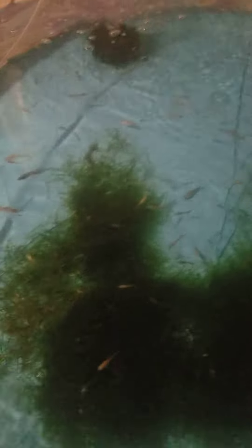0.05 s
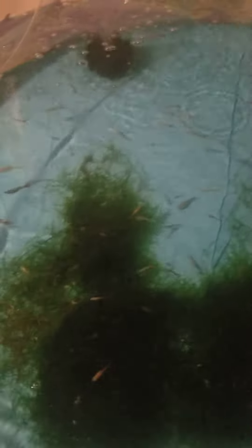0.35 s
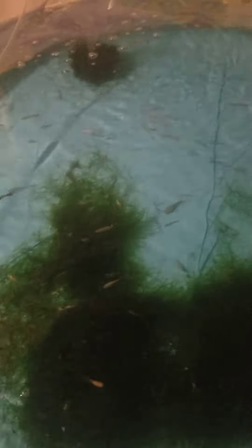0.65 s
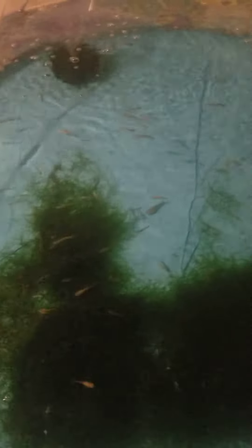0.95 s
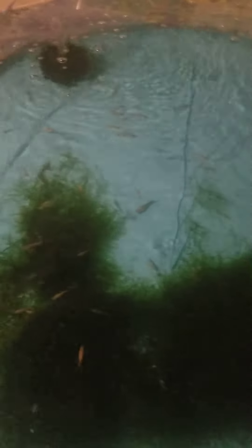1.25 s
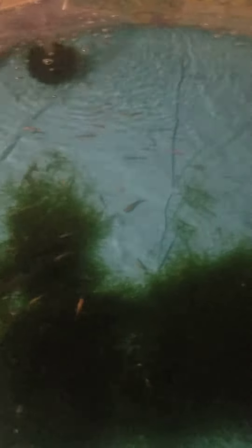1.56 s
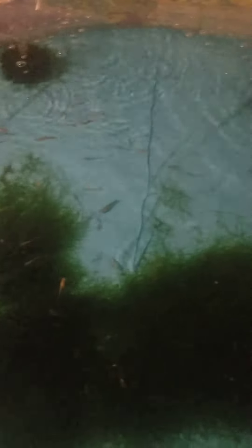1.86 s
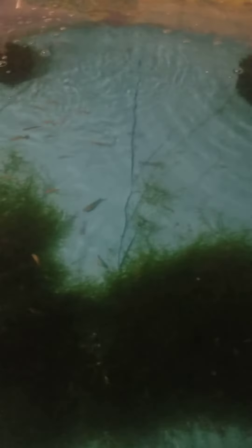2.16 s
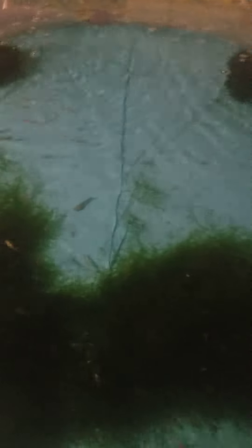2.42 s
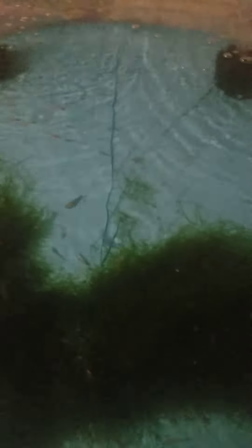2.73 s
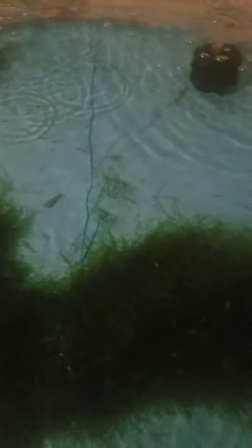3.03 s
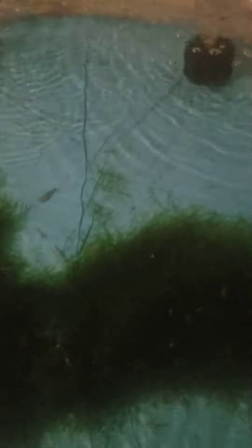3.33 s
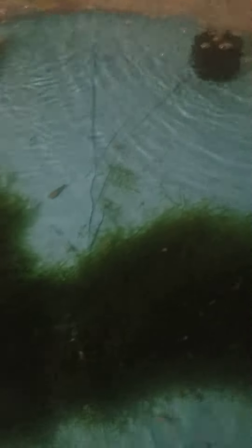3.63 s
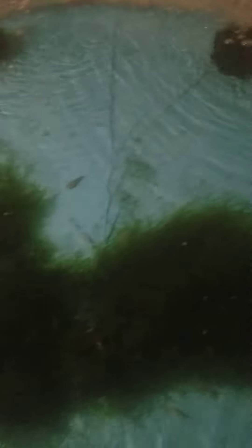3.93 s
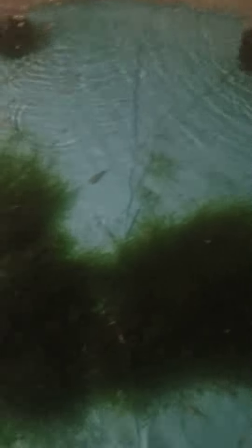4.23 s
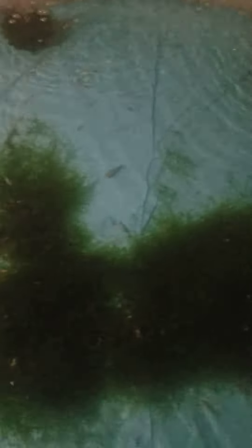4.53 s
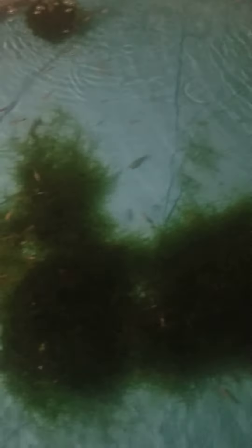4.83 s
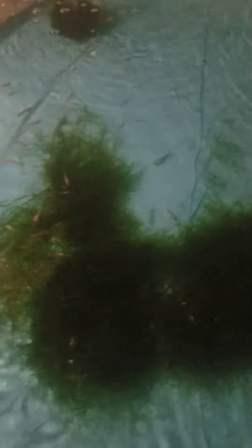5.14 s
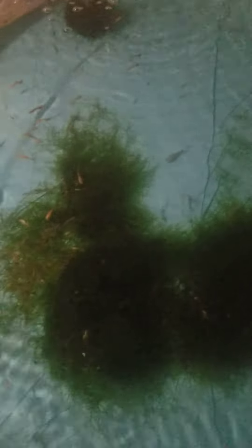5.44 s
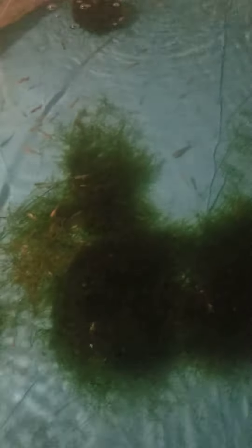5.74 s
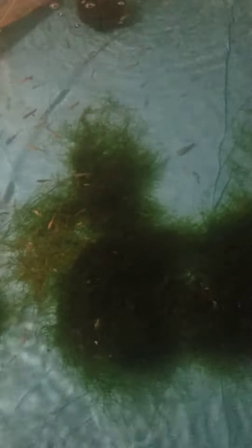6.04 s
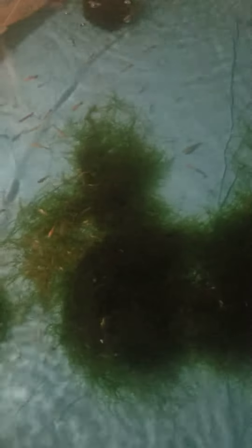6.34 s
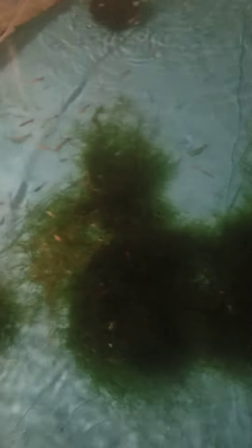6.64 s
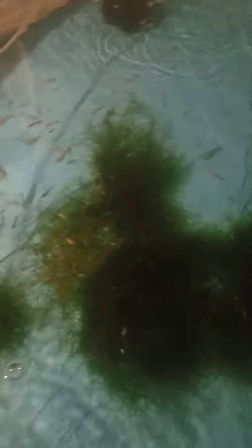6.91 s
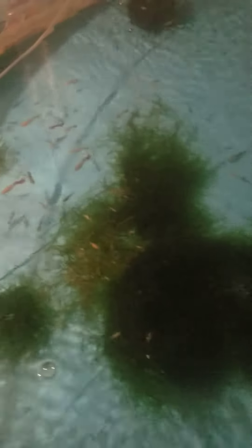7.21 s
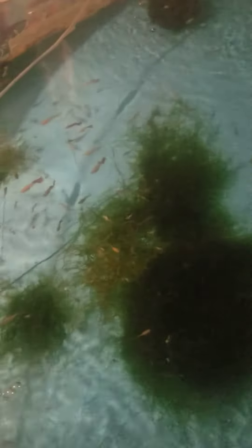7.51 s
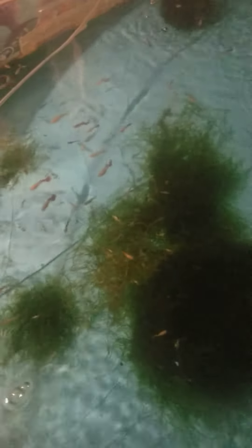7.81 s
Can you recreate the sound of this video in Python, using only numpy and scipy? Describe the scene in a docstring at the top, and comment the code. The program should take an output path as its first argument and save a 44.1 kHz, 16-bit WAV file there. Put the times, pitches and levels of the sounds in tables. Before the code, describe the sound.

Close above a fish tub indoors, an air pump keeps up a constant low hum while fine bubbles burst in a continuous high hiss. A soft rumble of churned water lies beneath, and four quiet bass thuds pass early on. As the hand-held microphone moves across the tub and back, the hiss gently changes colour and the hum turns slightly buzzier for a while.

```python
"""A bright, steady fizz, close above a fish tub indoors: tiny bubbles from an air stone snap and ping
at the surface. Beside the tub the air pump's diaphragm hums at twice the mains frequency, while the
rising plume burbles softly and four dull bumps sound low in the bass. A hand-held stereo microphone
drifts over the water, so the echoes of the tub slowly recolour the fizz."""
import sys
import numpy as np
from scipy import signal
from scipy.fft import rfft, irfft, next_fast_len
from scipy.io import wavfile
from scipy.ndimage import uniform_filter1d, map_coordinates

SR = 44100
rng = np.random.default_rng(int(sys.argv[2]) if len(sys.argv) > 2 else 0)


def store_pcm(level_fs):
    """Save levels as 16-bit WAV."""
    pcm = np.round(np.clip(level_fs, -1, 1) * 32767).astype(np.int16)
    wavfile.write(sys.argv[1], SR, np.atleast_2d(pcm).T)


N = 355887

# The fizz as the microphone nears and leaves the bubbles. Each row: time in seconds, level in dB.
FIZZ_LEVEL = [(0, -19), (3.2, -19.5), (3.9, -19), (4.7, -19), (5.3, -19), (6.3, -19.5), (8.07, -19.5)]


def fizz(t, swing):
    """Just below the microphone, films snap and the opened bubbles ping near 5 kHz."""
    spray = film_snaps()
    pings = bubbles(count=20000, pitch_hz=4907, spread=0.078, ring_cycles=7.9, scatter_db=4,
                    rise=0.0033, samples=400)
    pings = room(pings, t60_s=0.18, direct=0.097) * amp([[-12], [-7.5]])  # left, right
    cloud = tub(spray + pings, echo_gain=0.041, echo_from_hz=4500, longest_s=0.008, drift_s=0.00006)
    level_db, = curves(FIZZ_LEVEL, t)
    puffs_db = 0.15 * wobble(45, t)  # the air leaves the stone slightly unevenly
    lean_left_db = 0.3 - 0.2 * swing
    return amp(level_db + puffs_db + np.array([lean_left_db, -lean_left_db]) / 2) * cloud


# The colour of the bursting films at the left and at the right capsule.
# Each row: frequency in Hz, relative spectral level in dB.
SNAP_COLOUR_LEFT = [(500, -25), (1300, -30.5), (2150, -18.5), (2450, -14.5), (3100, -13), (4150, -8),
                    (4600, -2), (5500, -4.5), (6100, -13), (7100, -12), (7900, -23), (9200, -28),
                    (9900, -15), (11200, -19.5), (12200, -15.5), (13000, -17), (15000, -45)]
SNAP_COLOUR_RIGHT = [(500, -32.5), (1300, -31.5), (1550, -19.5), (2150, -20), (2450, -14), (3000, -14.5),
                     (3700, -5), (4700, 1), (5500, 0), (6100, -13), (7000, -17), (7900, -33.5),
                     (9200, -24.5), (9900, -16.5), (11200, -20), (12150, -13.5), (13000, -16.5),
                     (15000, -46)]


def film_snaps():
    """Thousands of bubble films snap every second and blend into a fine spray of sound."""
    def colour(hz):
        low_cut = hz / np.hypot(hz, 300)
        return amp([along(SNAP_COLOUR_LEFT, hz), along(SNAP_COLOUR_RIGHT, hz)]) * low_cut

    snaps = bubbles(count=50000, pitch_hz=6920, spread=0.7, ring_cycles=0.58, scatter_db=2,
                    rise=0, samples=32)
    band_hz, power = signal.welch(snaps, SR, nperseg=128, detrend=False)
    whitened = filtered(snaps, lambda hz: np.interp(hz, band_hz, power) ** -0.5)
    return unit(filtered(room(whitened, t60_s=0.15, direct=0.11), colour))


# The tub's narrow resonances and gaps, the same wherever the microphone is held.
# Each row: frequency in Hz, half width in Hz, lift in dB.
TUB_RESONANCES = [(3320, 50, 2), (3440, 60, -2.5), (3625, 40, 3), (3810, 35, 1.5), (3945, 35, 1.5),
                  (4060, 60, -2), (12200, 110, 2), (12850, 250, -2.5)]
# Standing waves over the water, each singing while a capsule passes through it; a negative lift is a
# node. Each row: middle in seconds, length in seconds, pitch in Hz, glide in Hz per second,
# half width in Hz, left lift in dB, right lift in dB.
TUB_STANDING_WAVES = [ (0.15, 0.73, 4640, 40, 80, -11, 9.5), (0.65, 1, 5250, -10, 115, 4, 2),
                      (0.964, 2.8, 4760, 30, 40, 2.5, 4.5), (1.1, 0.65, 5095, -70, 60, 5, 8),
                      (1.6, 0.95, 3680, 10, 40, 2.5, 7), (2.1, 0.68, 5700, 60, 50, 11, 2),
                      (2.35, 0.84, 5390, 60, 85, 8, 7), (2.9, 2.8, 3190, 54, 80, -5, 6.5),
                      (3.05, 0.55, 4400, -70, 90, -7, -11), (3.2, 1.1, 5170, 50, 65, 10, 1.5),
                      (3.25, 0.65, 5060, 40, 70, 0, 10), (3.5, 1.4, 3970, -130, 70, 0, 7.5),
                      (3.85, 2.4, 3450, -10, 70, 7, -1), (4.0, 1.7, 5850, -40, 70, 1.5, 9.5),
                      (4.15, 1, 4600, -60, 50, 6, -6), (4.7, 1.3, 5120, 70, 65, 4.5, 1),
                      (5.0, 2.8, 4780, 0, 45, 1.5, 5.5), (5.633, 1.8, 5296, 35, 72, 2.5, 12),
                      (6.1, 1.4, 4320, -20, 110, 3, 6.5), (6.9, 0.49, 5330, 70, 205, 5, 4.5),
                      (7.7, 1.5, 3300, -20, 50, 2.5, 10.5), (7.35, 2.7, 4770, 70, 40, 0, 6.5),
                      (7.482, 0.91, 4980, 40, 150, 4, 9), ]


def tub(sound, echo_gain, echo_from_hz, longest_s, drift_s, echoes=8, fade_s=0.11):
    """The tub colours the fizz with resonances, passing standing waves and drifting wall echoes."""
    hz, t, spectrum = signal.stft(sound, SR, nperseg=2048)
    hz = hz[:, None]

    def peak(centre_hz, width_hz):
        return 1 / (1 + ((hz - centre_hz) / width_hz) ** 2)

    def wall_echo():
        delay_s = longest_s * rng.uniform(0.25, 1) + drift_s * wobble(0.577, t)
        return np.exp(-2j * np.pi * hz * delay_s)

    lift_db = sum(db * peak(centre_hz, width_hz) for centre_hz, width_hz, db in TUB_RESONANCES)
    for middle_s, length_s, pitch_hz, glide, width_hz, *capsule_db in TUB_STANDING_WAVES:
        inside = 1 / (1 + np.exp((np.abs(t - middle_s) - length_s / 2) / fade_s))
        wave = inside * peak(pitch_hz + glide * (t - middle_s), width_hz)
        lift_db = lift_db + np.multiply.outer(capsule_db, wave)
    reflected = echo_gain * hz / np.hypot(hz, echo_from_hz)  # small walls reflect short waves best
    walls = np.array([1 + reflected * sum(wall_echo() for _ in range(echoes)) for capsule in sound])
    _, coloured = signal.istft(spectrum * amp(lift_db) * walls, SR, nperseg=2048)
    return unit(coloured[:, :N])


# The pump, heard from over the water. Each row: time in seconds, gain in dB for all its harmonics.
HUM_GAIN = [(0.0, -26.5), (2.0, -27), (5.42, -26.5), (8.07, -26.5)]
# The harmonics of the diaphragm's stroke. Each row: multiple of the hum's pitch, relative level in dB,
# extra gain in dB with the microphone swung fully right.
STROKE_HARMONICS = [(1, 4, 0), (2, -24, -1.5), (3, -25.5, -1.5), (4, -34, 1), (5, -26, -2), (6, -34, 9),
                    (7, -30.5, 0.5), (9, -32, 5.5), (11, -49, 12)]


def pump(t, swing, pitch_hz=120.02):
    """Beside the tub, the diaphragm hums almost purely; its weak overtones flutter and waver."""
    gain_db, = curves(HUM_GAIN, t)
    hum = np.zeros((2, N))
    for multiple, db, swing_db in STROKE_HARMONICS:
        unsteady = min(multiple - 1, 2)  # the fundamental holds still
        waver = 0.87 * unsteady * np.array([wobble(0.73, t), wobble(0.89, t)])  # left, right
        flutter_db = 0.59 * unsteady * wobble(14, t)
        level = amp(db + swing_db * swing + 0.5 * waver + flutter_db)
        phase = 2 * np.pi * (multiple * pitch_hz * t + rng.random())
        hum += level * np.sin(phase + 0.031 * multiple * waver[::-1])
    return amp(gain_db) * hum


# Churned water and the room around it. Each row: frequency in Hz, relative spectral level in dB.
RUMBLE_COLOUR = [(20, -26), (38, -18), (52, -11.5), (80, -4), (130, -5.5), (165, -8), (225, -8.5),
                 (290, -12.5), (400, -17.5), (700, -19), (1200, -18), (1600, -17.5), (2500, -25.5)]
# How alike the rumble is at the two capsules. Each row: frequency in Hz, correlation from 0 to 1.
RUMBLE_LIKENESS = [(30, 1), (100, 0.69), (250, 0.95), (600, 0.8), (1100, 0)]


def plume():
    """Under the surface, rising air churns the water: a soft rumble and the gulps of big bubbles."""
    def mid_side_colour(hz):
        angle = np.arccos(np.clip(along(RUMBLE_LIKENESS, hz), -1, 1)) / 2
        return amp(along(RUMBLE_COLOUR, hz)) * [np.cos(angle), np.sin(angle)]

    mid, side = filtered(rng.standard_normal((2, N)), mid_side_colour)
    rumble = unit(np.array([mid + side, mid - side]))
    gulps = bubbles(count=300, pitch_hz=225, spread=0.09, ring_cycles=6.7, scatter_db=6,
                    rise=0.013, samples=5000)
    return amp(-39) * rumble + amp(-55) * gulps


# Soft bumps in the background, alike at both capsules. Each row: start in seconds, peak level in dB.
LOW_BUMPS = [(.444, -35), (1.244, -37), (2.32, -37), (3.7, -41.5)]


def bumps(t, pitch_hz, swell_s):
    """Dull, short thuds: a bass tone swells quickly and dies away."""
    out = np.zeros(N)
    for start_s, db in LOW_BUMPS:
        age = np.maximum(t - start_s, 0)
        envelope = age / swell_s * np.exp(1 - age / swell_s)
        out += amp(db) * envelope * np.sin(2 * np.pi * pitch_hz * age)
    return out


def room(sound, t60_s, direct, renewals=13):
    """Each capsule hears the source and its own diffuse tail, renewed as the microphone moves."""
    t = np.arange(SR // 5) / SR
    hop = N // renewals + 1
    padded = np.pad(sound, (hop, hop * (renewals + 1) - N), mode="wrap")
    pieces = np.array([padded[k * hop:(k + 2) * hop] for k in range(renewals + 1)])
    pieces *= signal.windows.cosine(2 * hop)
    spectra = rfft(rng.standard_normal((renewals + 1, 2, len(t))) * amp(-60 * t / t60_s))
    # the room's modes lie close and even, so none sticks out
    local_power = uniform_filter1d(np.abs(spectra) ** 2, size=20, axis=2)
    tails = irfft(spectra / np.sqrt(local_power), len(t))
    tails /= np.linalg.norm(tails, axis=2, keepdims=True)
    tails[..., 0] += direct
    out = np.zeros((2, len(padded) + len(t)))
    for k, piece in enumerate(signal.fftconvolve(pieces[:, None], tails, axes=2)):
        out[:, k * hop:][:, :piece.shape[1]] += piece
    return unit(out[:, hop:hop + N])


def bubbles(count, pitch_hz, spread, ring_cycles, scatter_db, rise, samples):
    """A swarm of damped sines; rise bends each one upward as its bubble meets the surface."""
    start = rng.integers(0, N, (count, 1))
    hz = pitch_hz * np.exp(spread * rng.standard_normal((count, 1)))
    strength = amp(scatter_db * np.minimum(rng.exponential(size=(count, 1)), 4))
    cycles = hz * np.arange(samples) / SR
    decay = cycles / ring_cycles
    envelope = strength * np.exp(-decay) * (1 - np.exp(-2 * cycles))
    rings = envelope * np.sin(2 * np.pi * cycles * (1 + rise * decay))
    positions = start + np.arange(samples)
    return unit(np.bincount(positions.ravel(), rings.ravel(), minlength=N)[:N])


def amp(db):
    """Decibels to gain."""
    return 10 ** (np.asarray(db) / 20)


def unit(x):
    """x scaled to rms 1."""
    return x / np.sqrt(np.mean(x ** 2) + 1e-20)


def along(points, hz):
    """(Hz, value) points read on a log axis."""
    point_hz, values = np.transpose(points)
    return np.interp(np.log(hz + 1), np.log(point_hz + 1), values)


def curves(rows, t):
    """Each column after the time, read at the times t."""
    times, *columns = np.transpose(rows)
    return [np.interp(t, times, column) for column in columns]


def wobble(rate, t):
    """A smooth random curve with rate knots a second."""
    return map_coordinates(rng.standard_normal(400), [t * rate + 2], mode="mirror")


def filtered(x, response):
    """x through a filter whose gain is response(hz)."""
    size = next_fast_len(N + SR // 2)
    return irfft(rfft(x, size) * response(np.fft.rfftfreq(size, 1 / SR)), size)[..., :N]


# The microphone swings right, where the pump's buzz is clearer, and back.
# Each row: time in seconds, position from about -1 (left) to 1 (right).
MICROPHONE_SWING = [(0, -0.43), (1.5, 0.32), (2.6, 0.71), (3.5, 0.85), (4.6, 0.048), (5.6, -0.3),
                    (8.07, -1.1)]


def scene():
    """Fizz, pump, plume and bumps, heard from over the water."""
    t = np.arange(N) / SR
    swing, = curves(MICROPHONE_SWING, t)
    return pump(t, swing) + fizz(t, swing) + plume() + bumps(t, pitch_hz=70, swell_s=0.015)


def record(dry):
    """The microphone keeps nothing above 15350 Hz."""
    return filtered(dry, lambda hz: hz < 15350)


dry = scene()
out = record(dry)
store_pcm(out)
```